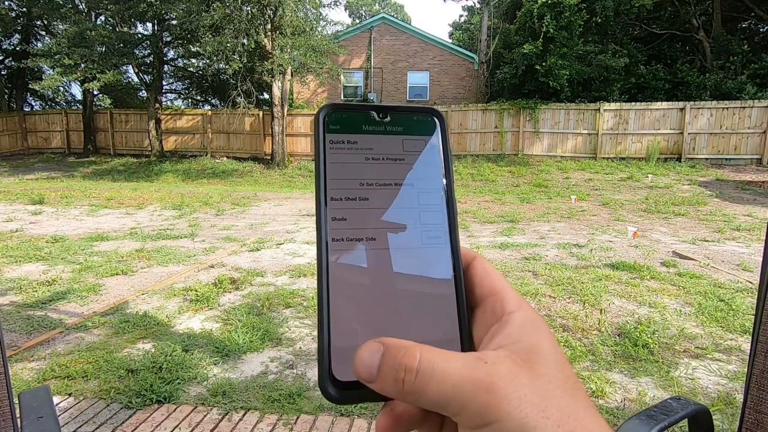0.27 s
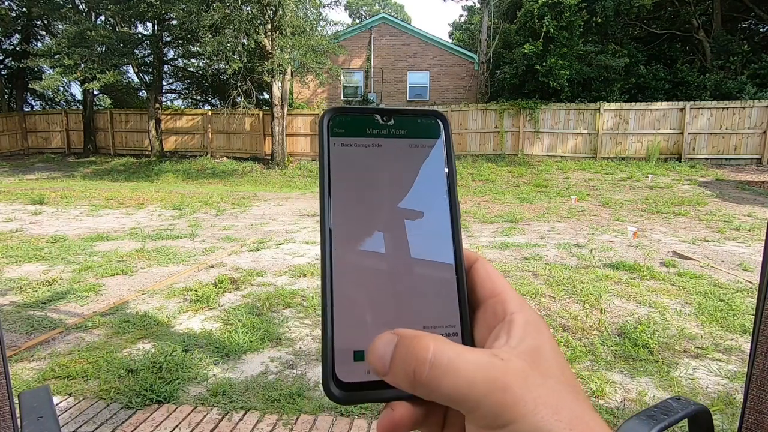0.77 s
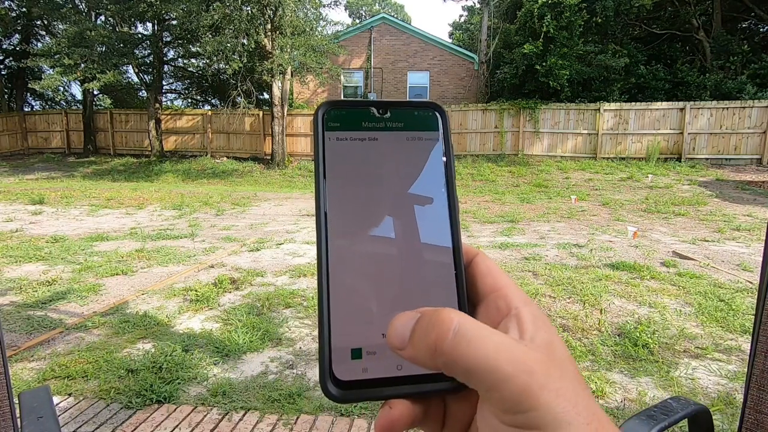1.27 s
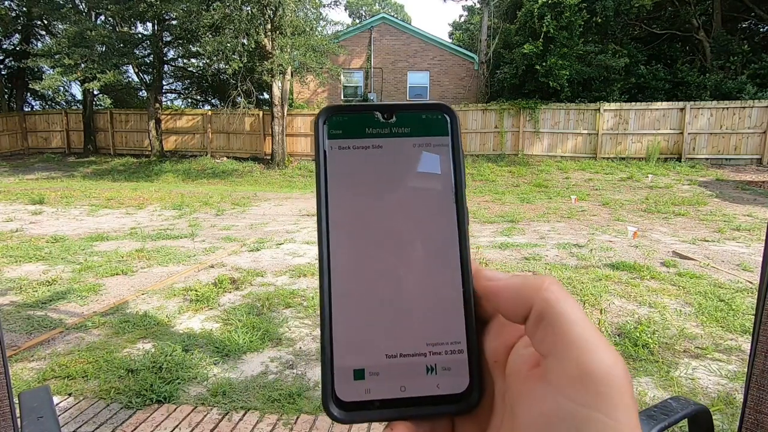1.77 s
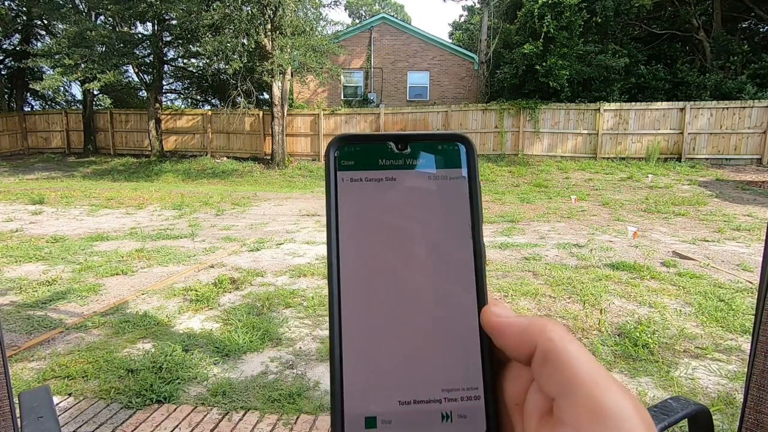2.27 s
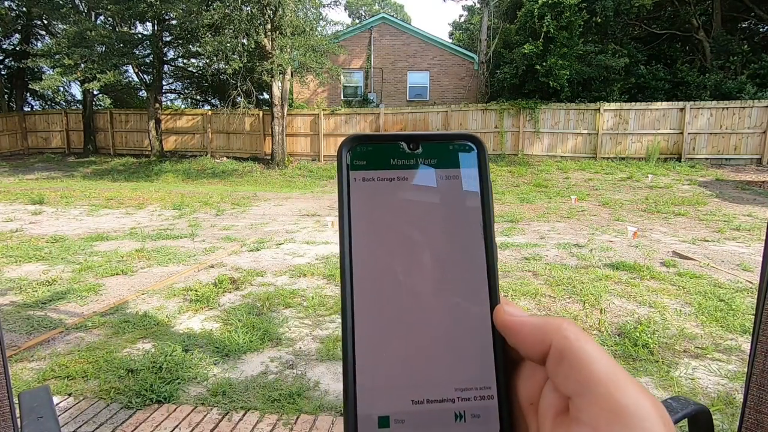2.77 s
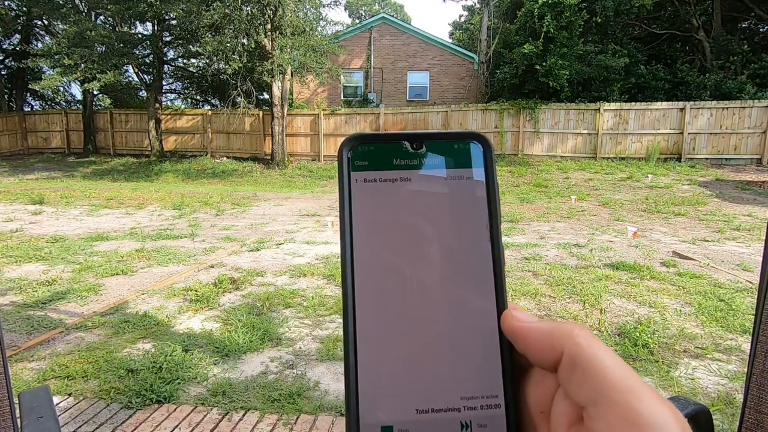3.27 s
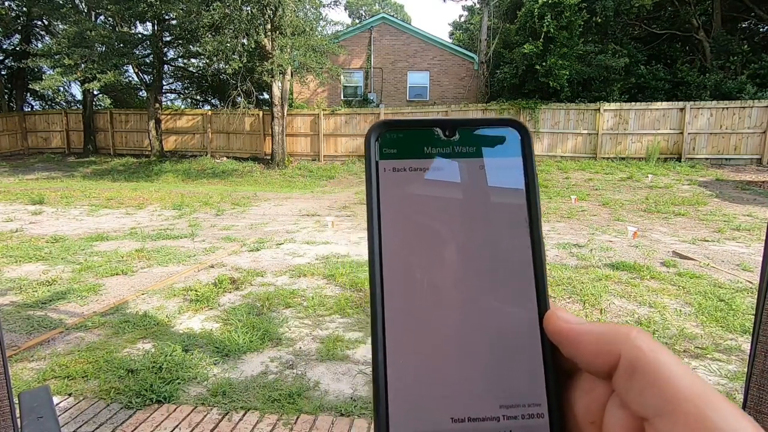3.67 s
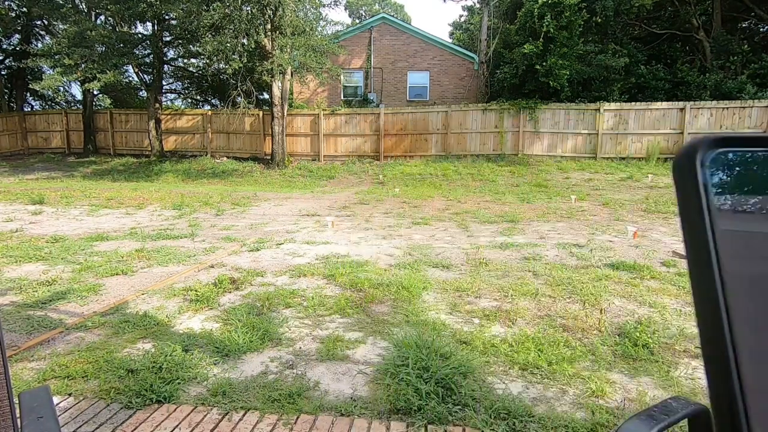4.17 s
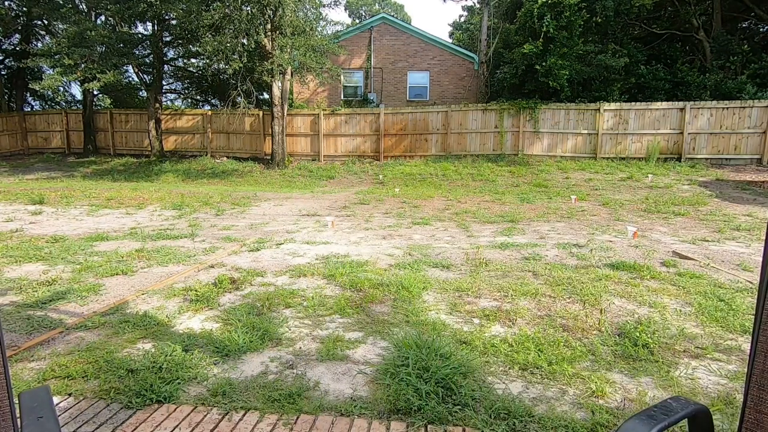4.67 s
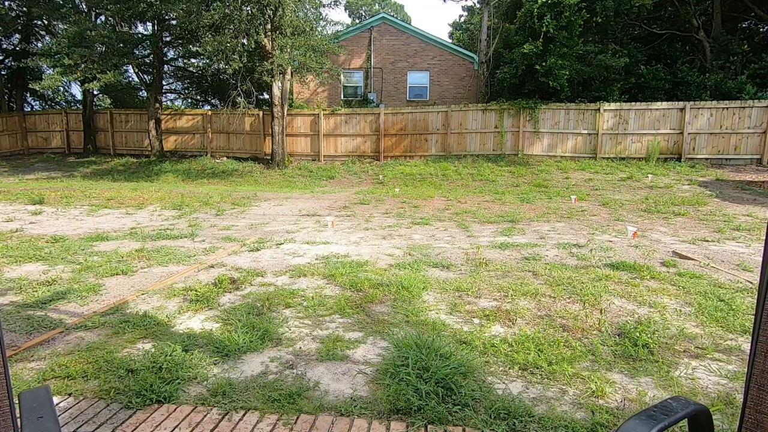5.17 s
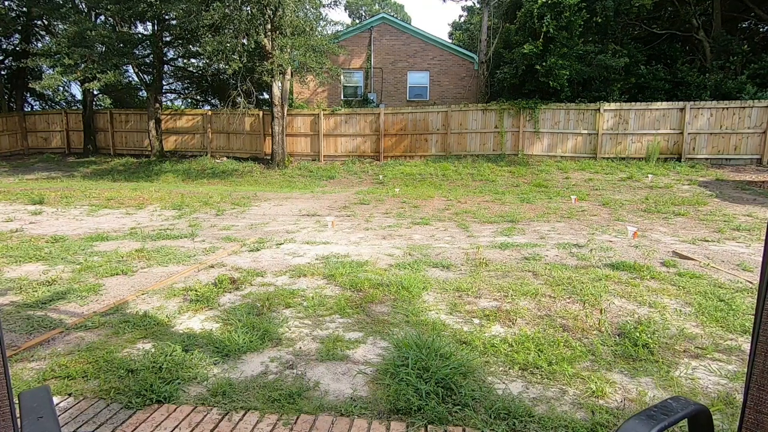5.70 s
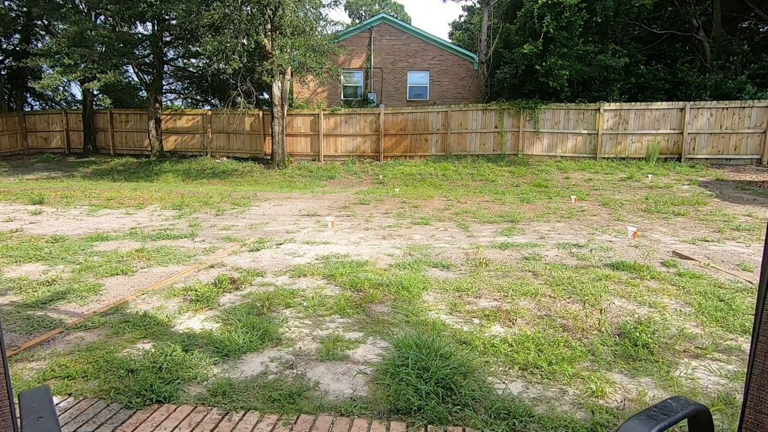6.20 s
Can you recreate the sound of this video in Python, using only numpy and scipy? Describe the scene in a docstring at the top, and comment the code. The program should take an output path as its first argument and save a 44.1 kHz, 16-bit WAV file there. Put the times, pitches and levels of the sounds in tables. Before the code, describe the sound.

Lawn sprinklers sputter to life with hollow, hissing spits after a quiet stretch of shrilling insects and far-off traffic.

```python
"""Lawn sprinklers start in a fenced yard: water drives the air out of the heads in spits that grow louder
and wetter. Turbulence excites the resonances of the air column in each riser, giving a hoarse, hollow
note, while the spray radiates broadband hiss. From the outset insects shrill in the trees, a far engine
drones and fades, distant traffic rumbles and slow air movement sways the pressure at the microphone.
There are a few soft, brief rustles and one sharp tick; fence and house wall reflect spray and rustles."""
import sys
import numpy as np
from scipy import signal
from scipy.fft import rfft, irfft, next_fast_len
from scipy.io import wavfile
from scipy.ndimage import map_coordinates

SR = 44100
rng = np.random.default_rng(int(sys.argv[2]) if len(sys.argv) > 2 else 0)


def waveform_to_disk(signal):
    """Save audio, clipped to [-1, 1], as 16-bit WAV at the path in sys.argv[1]."""
    frames = np.transpose(np.atleast_2d(signal))
    scaled = np.clip(frames, -1, 1) * 32767
    samples = np.round(scaled).astype(np.int16)
    wavfile.write(sys.argv[1], SR, samples)


N = 284004

# Spectra of traffic, open yard, faint hiss and air movement: (frequency [Hz], relative density [dB])
RUMBLE_SPECTRUM = [(15, 5.5), (28, 10), (45, 1.5), (65, 2.5), (93, 1), (135, 0.5), (200, 0), (295, -5),
                   (350, -14.5), (700, -39), (2000, -90)]
MURK_SPECTRUM = [(150, -25), (350, -1.5), (700, 0), (1100, -5.5), (1500, -9), (2200, -12), (3000, -15.5),
                 (5500, -20.5), (7500, -48)]
HISS_SPECTRUM = [(3500, -17.5), (5600, -3.5), (10000, -3), (15500, -4.5)]
SWAY_SPECTRUM = [(.1, 10), (.7, -4.5), (2.4, -4), (5, -11), (7, -11.5), (12, -40), (25, -44), (50, -63),
                 (120, -100), (300, -140)]
# Envelopes of the air movement and of the low background: (time [s], relative level [dB])
SWAY_ENVELOPE = [(0, -20.5), (.3, -13), (2.1, -24.5), (3.8, -10.5), (4.9, -19), (6.1, -9.5), (6.44, -27.5)]
BASS_ENVELOPE = [(0, 2.5), (.77, 0), (1.15, 1.5), (3.6, -.5), (4.05, -4), (4.65, 0.5), (5.2, 1.5),
                 (6.44, 0)]
# Far exhaust: (time [s], firing rate [Hz], fundamental level [dB], second harmonic level [dB])
ENGINE_ORDERS = [(0, 60, -50, -38), (.17, 59.5, -41, -29.5), (.38, 61, -41, -32.5),
                 (.52, 62.3, -34.5, -29.5), (.63, 64, -42.5, -39), (1.1, 67, -48.5, -46),
                 (1.4, 67, -44.5, -54), (1.7, 60.5, -60, -46.5), (2.1, 63.5, -52, -40.5),
                 (2.7, 66, -45, -49), (3.55, 66.5, -43, -46.5), (3.9, 66, -49, -61)]
# Partials of a distant machine: (frequency [Hz], relative level [dB])
HUM_PARTIALS = [(120.5, -51), (147, -56.5), (221, -63), (294, -58), (441, -64)]
# Nearer insects: (first chirp [s], period [s], frequency [Hz], relative level [dB])
NEAR_INSECTS = [(.06, .342, 6545, -49.5), (.38, .48, 6800, -52), (.05, .39, 6980, -57)]
# Noise whose envelope roughens a chirp: (frequency [Hz], relative density [dB])
RASP_SPECTRUM = [(25, -6), (60, -9), (150, -21), (500, -60), (1500, -100)]
# Spectra of the massed insects and of a farther chorus: (frequency [Hz], relative density [dB])
SHRILL_SPECTRUM = [(5900, -28), (6150, -17.5), (6350, -9.5), (6550, -3), (6650, -3), (6800, -4),
                   (6980, -8.5), (7100, -12), (7600, -42)]
CHORUS_SPECTRUM = [(5600, -11), (6300, -4), (7100, -1.5), (7500, 1), (8150, -0.5), (8500, 3), (9100, -2.5),
                   (10000, -13), (12000, -30)]
# Swelling and easing of the shrilling: (time [s], gain [dB])
INSECT_ENVELOPE = [(0, 0), (1, -.5), (1.85, 1.5), (2.6, -.5), (3.1, 0.5), (4.5, -1.1), (5.5, -0.5),
                   (6.44, -7.5)]
# Soft, brief rustles, and fine puffs of mist: (time [s], level [dB], Gaussian width [s])
RUSTLES = [(.183, -42, 0.015), (.228, -48, 0.081), (4.185, -44, .009), (4.735, -46, 0.026)]
MIST_PUFFS = [(4.835, -46, 0.016), (5.05, -46, 0.011)]
# Spectra of rustle, mist and spray: (frequency [Hz], relative density [dB])
RUSTLE_SPECTRUM = [(300, -14), (600, 4), (850, 6.5), (1150, -5), (1900, -2), (2600, -10), (4500, -8),
                   (5500, -11), (8500, -10), (10500, -29), (15000, -24)]
MIST_SPECTRUM = [(2000, -17), (4000, 7), (8000, 0), (11000, -7), (14000, -3), (16000, -8)]
SPRAY_SPECTRUM = [(300, -17), (700, 2.5), (1000, -7), (1600, 4), (2200, -3.5), (2700, -1.5), (3300, 1.5),
                  (4300, -5.5), (4800, -10.5), (5600, -8.5), (8600, -10.5), (10500, -21), (15000, -28)]
# A small hard contact: (time [s], relative level [dB])
CONTACTS = [(.741, -27.5)]
# Its modes of vibration: (frequency [Hz], relative level [dB], 60 dB decay time [s])
CONTACT_MODES = [(5620, -6, 0.02), (6200, 1.5, 0.019), (6700, -12, 0.066)]
# Spits from the heads: (time [s], duration [s], relative spray level [dB], relative note level [dB])
HEAD_SPITS = [(4.69, .035, -48.5, -60), (4.776, 0.032, -43, -46.5), (4.906, 0.1, -44, -42),
              (5.064, 0.08, -32, -33), (5.208, 0.082, -37.5, -38), (5.416, 0.078, -38, -38.5),
              (5.592, 0.092, -36.5, -38.5), (5.714, 0.086, -39.5, -31.5), (5.779, 0.039, -32, -27),
              (5.885, 0.15, -32.5, -30), (6.104, 0.11, -31.5, -28.5), (6.273, 0.11, -30.5, -26.5)]
# Cavity resonances of a head: (frequency [Hz], bandwidth [Hz], relative level [dB])
HEAD_CAVITIES = [(2670, 110, 10), (2885, 110, 10.5), (3186, 170, 10), (4370, 250, -7)]
# Main note, the air column's second resonance, shifting with the water: (time [s], frequency [Hz])
RISER_NOTE = [(4.78, 1078), (4.872, 1100), (4.908, 1177), (5.034, 1134), (5.062, 1332), (5.176, 1344),
              (5.232, 1207), (5.56, 1181), (5.694, 1253), (5.726, 1130), (5.948, 1270), (6.44, 1301)]
# Upper resonances of the column: (multiple of the lowest resonance, relative level [dB])
RISER_MODES = [(3, 0), (4, 8), (5, 0), (6, -6), (7, -9.5)]
# Skirt of each resonance: (offset from its centre [Hz], relative density [dB])
RESONANCE_SKIRT = [(35, 7), (80, -6.5), (160, -3), (400, -17.5), (1500, -94)]
# Reverberation of the yard: (frequency [Hz], 60 dB decay time [s])
YARD_DECAY = [(300, 0.4), (2000, 0.34), (10000, 0.05)]

RUMBLE_DB, MURK_DB, HISS_DB, SHRILL_DB, CHORUS_DB = -39.5, -46.5, -57.5, -52, -55  # before modulation
CHIRP_WIDTH_S, CHIRP_SCATTER_S, CHIRP_SCATTER_HZ = 0.047, 0.02, 29.8
WATER_ARRIVES_S, FILL_S = 5.8, 0.22  # when water takes over from air in the risers, and how gradually
DRY_RISE_S, WET_RISE_S = 0.026, 0.062  # air bursts out quickly, water more slowly
DRY_RING, WET_RING = 0.41, 0.13  # share of the spray's power that rings in the pipe
SAG_DB_PER_S, RELEASE_DB_PER_S = 24, 135  # loss of pressure in a spit, and the added loss after it
DRIBBLE_DB, DRIBBLE_DB_PER_S = -3, 56  # trailing spray, relative to the sagging spit
JET_DB, TOP_HZ = -57, 15550


def amp(db):
    """Amplitude ratio for a level in decibels."""
    return 10 ** (np.asarray(db) / 20)


def unit(x):
    """Normalisation to rms 1."""
    return x / np.sqrt(np.mean(x ** 2) + 1e-20)


def clock():
    """Time of each sample in seconds."""
    return np.arange(N) / SR


def along(points, hz):
    """Interpolation of (frequency, value) points on a logarithmic frequency axis."""
    f, v = np.transpose(points)
    return np.interp(np.log(np.maximum(hz, 1e-3)), np.log(np.maximum(f, 1e-3)), v)


def curves(rows):
    """Linear interpolation, at every sample, of each column after the time."""
    times, *columns = np.transpose(rows)
    return [np.interp(clock(), times, column) for column in columns]


def wobble(rate):
    """Smooth random modulation: a spline through rate Gaussian values a second."""
    return map_coordinates(rng.standard_normal(int(N * rate / SR) + 4), [clock() * rate])


def filtered(x, response):
    """Linear filtering: the spectrum of x is multiplied by a frequency response."""
    size = next_fast_len(N + SR // 2)
    return irfft(rfft(x, size) * response(np.fft.rfftfreq(size, 1 / SR)), size)[:N]


def coloured(x, spectrum):
    """Spectral shaping of x, at rms 1."""
    return unit(filtered(x, lambda hz: amp(along(spectrum, hz))))


def noise(spectrum):
    """Gaussian noise of a given spectrum, at rms 1."""
    return coloured(rng.standard_normal(N), spectrum)


def band(phase, skirt):
    """Quadrature modulation centres a narrow band of noise, of rms 1, on a carrier."""
    return noise(skirt) * np.cos(phase) + noise(skirt) * np.sin(phase)


def impulses(rate, spread_db):
    """Shot noise: impulses at independent random times, at rms 1."""
    hits = rng.random(N) < rate / SR
    polarity = np.sign(rng.standard_normal(N))
    return unit(hits * polarity * amp(spread_db * np.clip(rng.standard_normal(N), -2, 2)))


def bursts(rows, spectrum):
    """Amplitude modulation of hiss and shot noise by brief Gaussian envelopes."""
    swell = sum(amp(db) * np.exp(-.5 * ((clock() - s) / width) ** 2) for s, db, width in rows)
    return swell * coloured(rng.standard_normal(N) + 0.62 * impulses(rate=990, spread_db=0), spectrum)


def air():
    """Superposed noise: rumble and murk of far traffic, faint hiss and slow swings of air pressure."""
    rumble = amp(RUMBLE_DB + curves(BASS_ENVELOPE)[0] + 0.5 * wobble(3.08)) * noise(RUMBLE_SPECTRUM)
    murk = amp(MURK_DB + 0.12 * wobble(4.9)) * noise(MURK_SPECTRUM)
    hiss = amp(HISS_DB) * noise(HISS_SPECTRUM)
    sway = amp(curves(SWAY_ENVELOPE)[0] - 1.0) * noise(SWAY_SPECTRUM)
    return rumble + murk + hiss + sway


def engine():
    """Periodic firing radiates harmonics, of which only the lowest two carry this far."""
    firing_hz, *orders_db = curves(ENGINE_ORDERS)
    phase = 2 * np.pi * np.cumsum(firing_hz * (1 + 0.0042 * wobble(12))) / SR
    return np.sqrt(2) * sum(amp(db + wobble(9.2)) * np.sin(k * phase) for k, db in enumerate(orders_db, 1))


def machine():
    """A distant machine hums with a line spectrum, each partial wavering in level and phase."""
    hum = sum(amp(db + 3.05 * wobble(2.924)) * np.sin(2 * np.pi * hz * clock() + 0.97 * wobble(3.6))
              for hz, db in HUM_PARTIALS)
    return np.sqrt(2) * amp(curves(BASS_ENVELOPE)[0]) * hum


def chirper(first, period, hz, db):
    """One insect repeats a Gaussian tone pulse; random amplitude modulation makes it rasp."""
    out = np.zeros(N)
    rasp = np.abs(signal.hilbert(noise(RASP_SPECTRUM)))
    for k, (late, sharp) in enumerate(rng.standard_normal((32, 2))):
        centre = first + k * period + CHIRP_SCATTER_S * late
        near = np.arange(max(round((centre - .2) * SR), 0), min(round((centre + .2) * SR), N))
        t = near / SR - centre
        swell = amp(db) * np.exp(-.5 * (t / CHIRP_WIDTH_S) ** 2)
        out[near] += swell * np.sin(2 * np.pi * (hz + CHIRP_SCATTER_HZ * sharp) * t)
    return out * unit(rasp)


def insects():
    """Many insects add incoherently into bands of noise, above which a few near ones chirp."""
    chirps = sum(chirper(*row) for row in NEAR_INSECTS)
    shrill = amp(SHRILL_DB + 1.1 * wobble(5.48)) * noise(SHRILL_SPECTRUM)
    chorus = amp(CHORUS_DB + 0.39 * wobble(5.9)) * noise(CHORUS_SPECTRUM)
    return amp(curves(INSECT_ENVELOPE)[0]) * (chirps + shrill) + chorus


def rustles():
    """Bursts of mid-band noise are heard as soft, brief rustles, the first near the start."""
    return bursts(RUSTLES, RUSTLE_SPECTRUM)


def tick():
    """Free vibration: a small hard contact excites modes that decay exponentially."""
    out = np.zeros(N)
    for onset, db in CONTACTS:
        t = np.maximum(clock() - onset, 0)
        attack = 1 - np.exp(-t / 0.00036)
        for hz, mode_db, t60 in CONTACT_MODES:
            out += attack * amp(db + mode_db - 60 * t / t60) * np.sin(2 * np.pi * (hz * t + rng.random()))
    return out


def wetness(time):
    """Displacement of air by water in the risers, as a fraction from 0 to 1."""
    return .5 + .5 * np.tanh((time - WATER_ARRIVES_S) / FILL_S)


def spit_powers():
    """Spits add in power: each swells, sags as its pressure is spent and ends in a dribble."""
    spray_power, note_power = np.zeros(N), np.zeros(N)
    for onset, length, spray_db, note_db in HEAD_SPITS:
        t = np.maximum(clock() - onset, 0)
        after = np.maximum(t - length, 0)
        rise = DRY_RISE_S + (WET_RISE_S - DRY_RISE_S) * wetness(onset)
        swell = np.minimum(t / rise, 1) * amp(-SAG_DB_PER_S * t)
        push = swell * amp(-RELEASE_DB_PER_S * after)
        dribble = swell * amp(DRIBBLE_DB - DRIBBLE_DB_PER_S * after)
        spray_power += (np.maximum(push, dribble) * amp(spray_db)) ** 2
        note_power += (push * amp(note_db)) ** 2
    return spray_power, note_power


def head_response(hz):
    """The cavities of a head act as damped resonators, summed with alternating sign."""
    return sum((-1) ** k * amp(db) * 1j * hz * width / (centre ** 2 - hz ** 2 + 1j * hz * width)
               for k, (centre, width, db) in enumerate(HEAD_CAVITIES))


def sprinklers():
    """Turbulence drives the riser's air column at its resonances; water shifts the balance to hiss."""
    spray_power, note_power = spit_powers()
    slugs = wobble(75)  # slugs of water chop the jet
    flow = unit((rng.standard_normal(N) + 0.5 * impulses(rate=900, spread_db=-0.5)) * amp(0.71 * slugs))
    cavities = unit(filtered(rng.standard_normal(N), head_response))
    hiss = unit(coloured(flow, SPRAY_SPECTRUM) + amp(-6.5) * cavities)
    lowest_hz = curves(RISER_NOTE)[0] / 2
    phase = 2 * np.pi * np.cumsum(lowest_hz + 4 * wobble(40)) / SR
    upper_modes = sum(amp(db) * band(k * phase, RESONANCE_SKIRT) for k, db in RISER_MODES)
    hollow = unit(upper_modes * amp(2.2 * slugs))
    # the harder the spit, the more the water modulates the frequency of the main note
    churn = np.sqrt(spray_power / spray_power.max())
    gargle = 2 * np.pi * np.cumsum(65 * churn * wobble(380)) / SR
    note = unit(band(2 * phase + gargle, RESONANCE_SKIRT) * amp(0.33 * slugs))
    ring_share = DRY_RING + (WET_RING - DRY_RING) * wetness(clock())
    spray = np.sqrt(ring_share) * hollow + np.sqrt(1 - ring_share) * hiss
    return amp(-1.4) * (np.sqrt(spray_power) * spray + amp(0.5) * np.sqrt(note_power) * note)


def jet():
    """Atomisation: fine mist hisses steadily once water reaches the nozzles."""
    return amp(JET_DB) * wetness(clock()) * noise(MIST_SPECTRUM)


def yard(x):
    """Reverberation: fence and house wall scatter a short tail whose treble decays first."""
    hz, t, spectra = signal.stft(rng.standard_normal(SR // 2), SR, nperseg=256)
    decay = amp(-60 * t / along(YARD_DECAY, hz)[:, None])
    tail = signal.istft(spectra * decay, SR, nperseg=256)[1]
    return signal.fftconvolve(x, tail / np.linalg.norm(tail))[:N]


def scene():
    """Superposition of spray and rustles, their reflections and the other sounds, in one channel."""
    direct = jet() + sprinklers() + rustles() + bursts(MIST_PUFFS, MIST_SPECTRUM)
    return (direct + amp(-14.0) * yard(direct) + tick() + insects() + engine() + machine() + air())[None]


def record(dry):
    """Band limiting: an ideal low-pass filter removes everything above TOP_HZ."""
    return filtered(dry[0], lambda hz: hz < TOP_HZ)[None]


dry = scene()
out = record(dry)
waveform_to_disk(out)
```